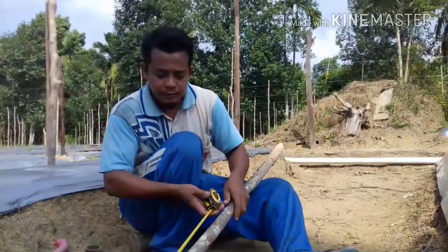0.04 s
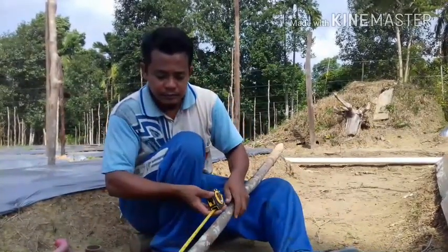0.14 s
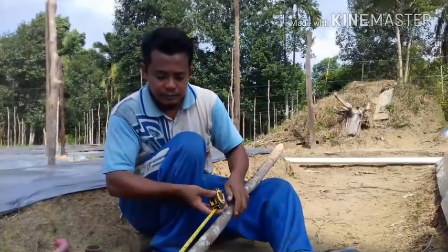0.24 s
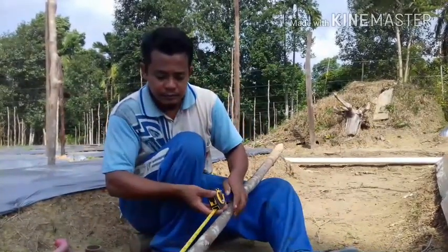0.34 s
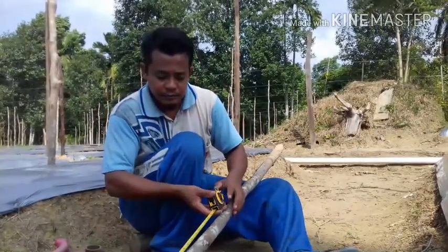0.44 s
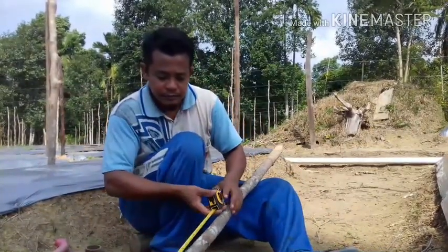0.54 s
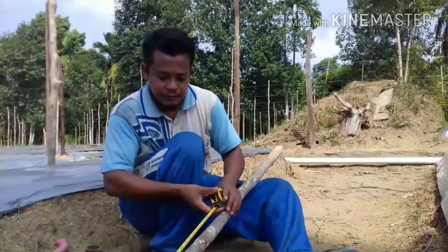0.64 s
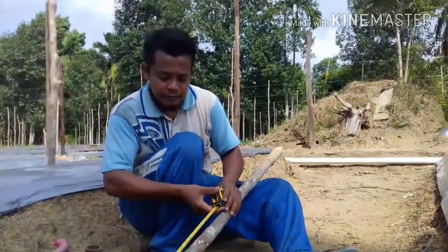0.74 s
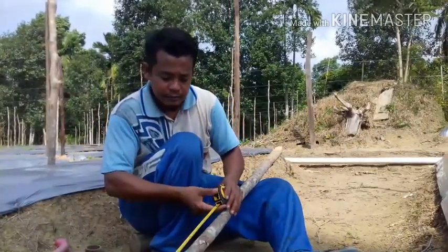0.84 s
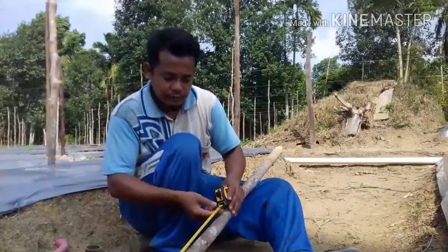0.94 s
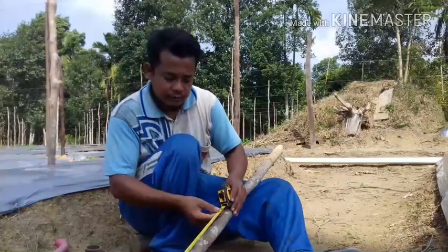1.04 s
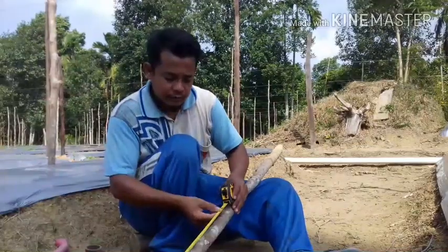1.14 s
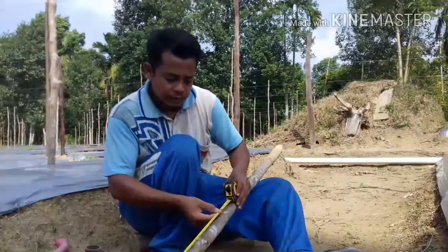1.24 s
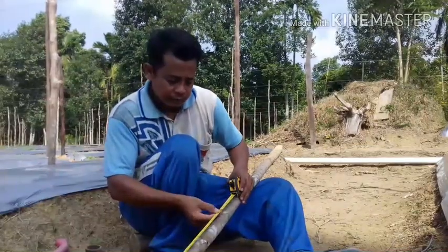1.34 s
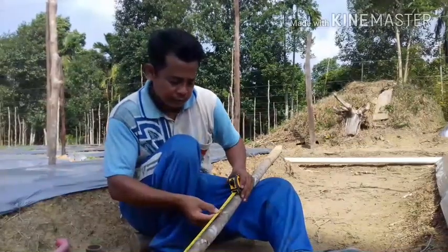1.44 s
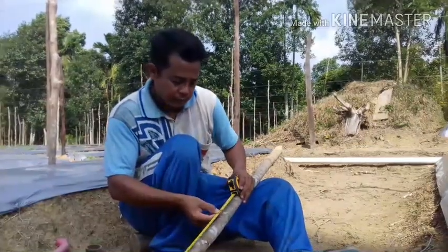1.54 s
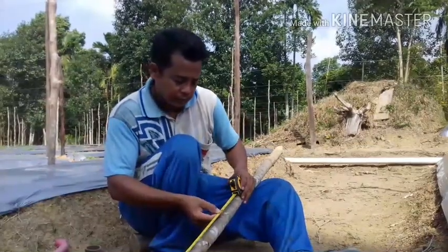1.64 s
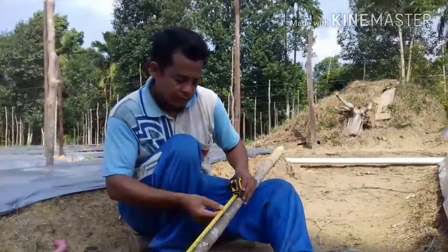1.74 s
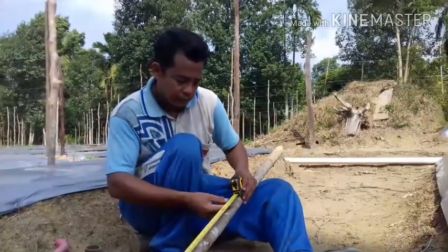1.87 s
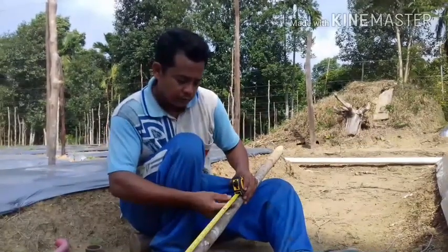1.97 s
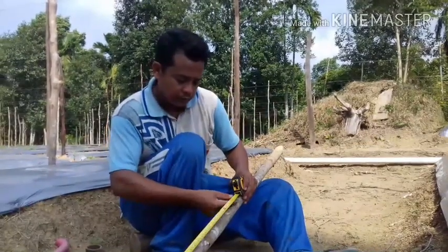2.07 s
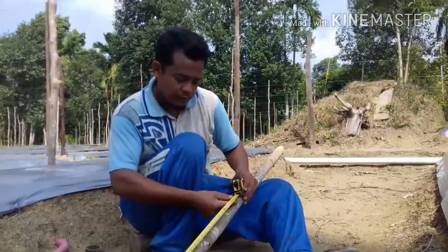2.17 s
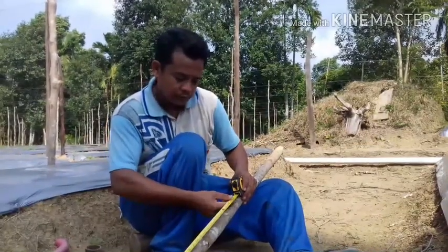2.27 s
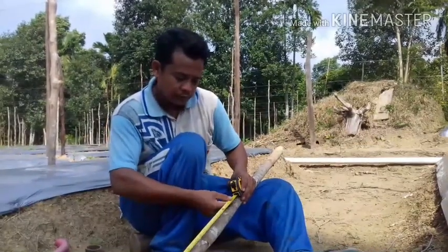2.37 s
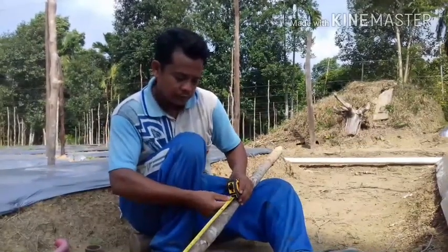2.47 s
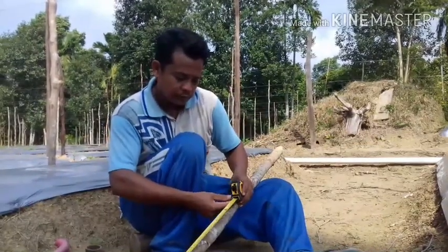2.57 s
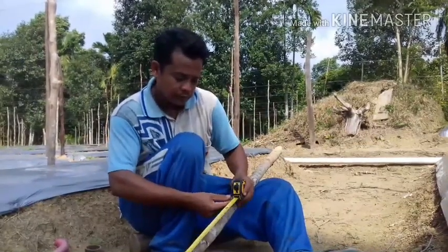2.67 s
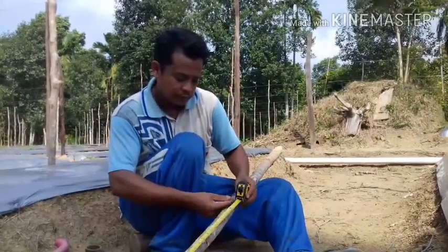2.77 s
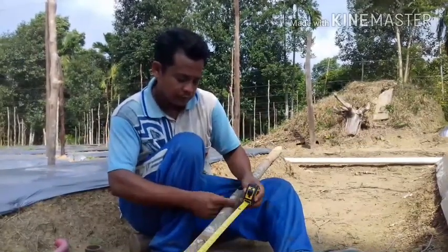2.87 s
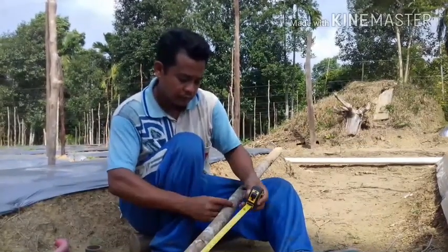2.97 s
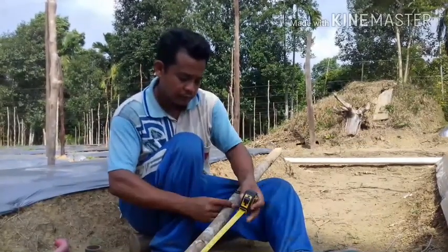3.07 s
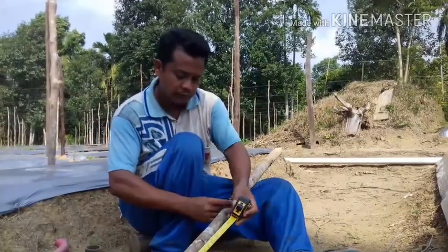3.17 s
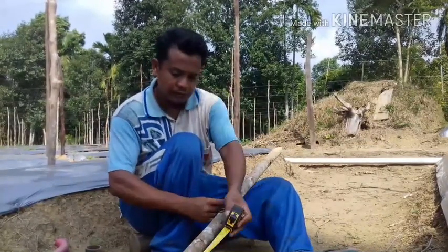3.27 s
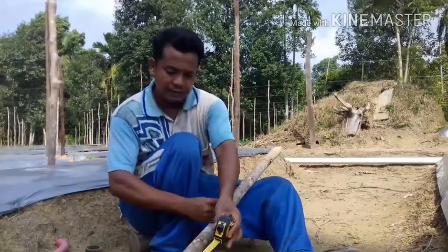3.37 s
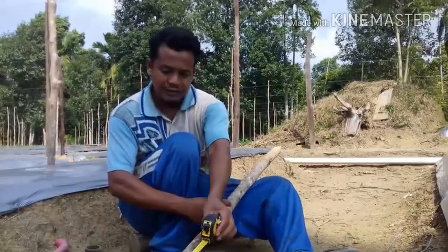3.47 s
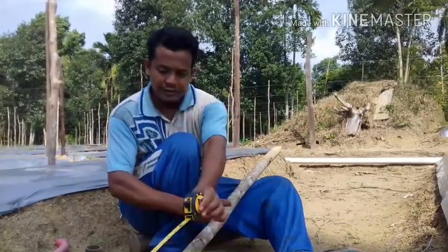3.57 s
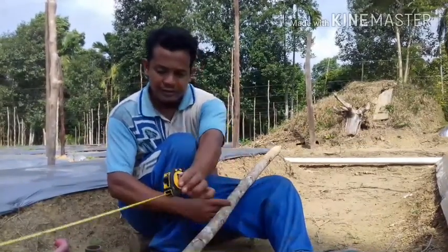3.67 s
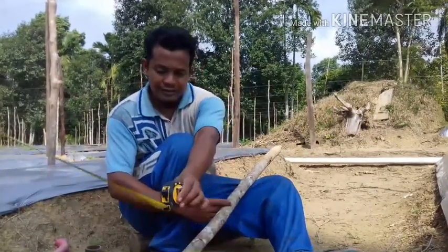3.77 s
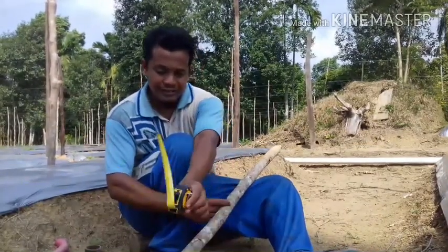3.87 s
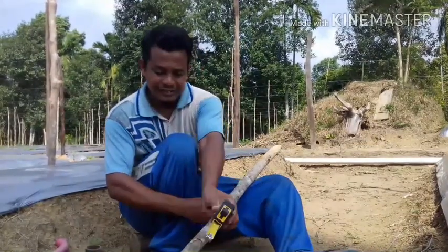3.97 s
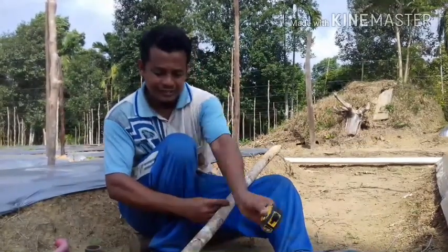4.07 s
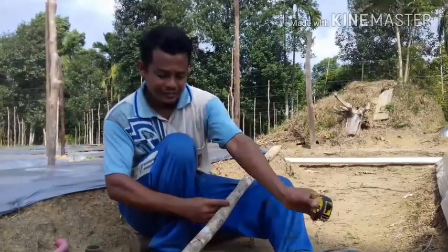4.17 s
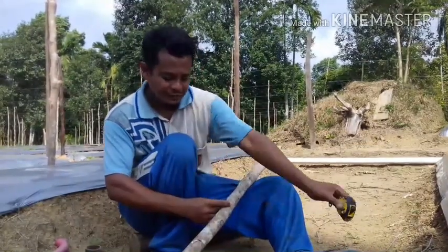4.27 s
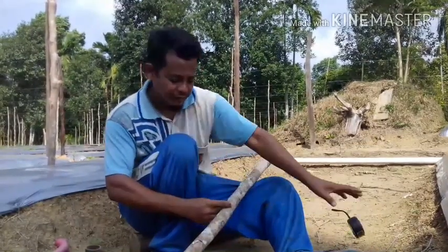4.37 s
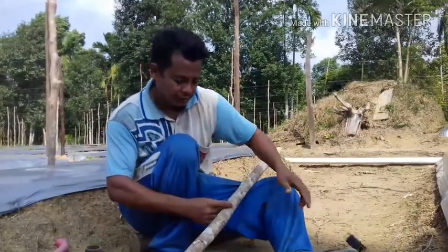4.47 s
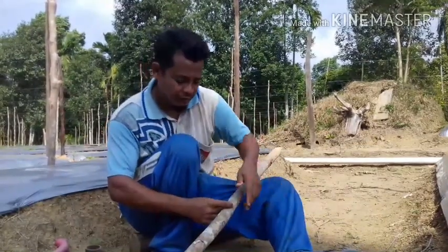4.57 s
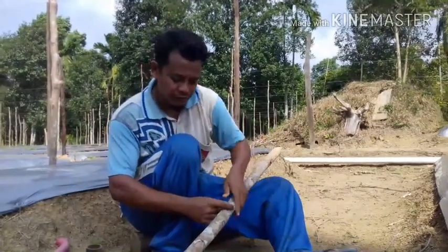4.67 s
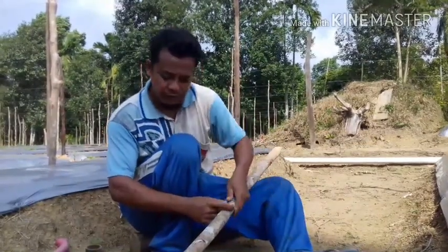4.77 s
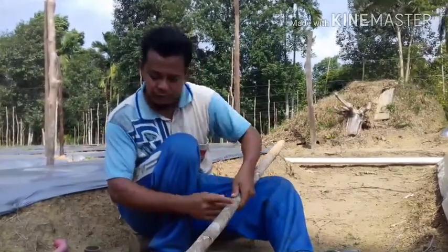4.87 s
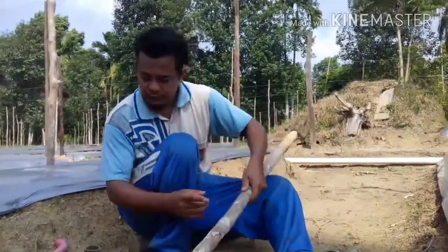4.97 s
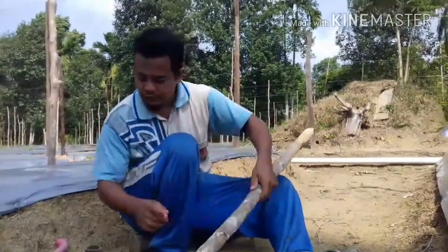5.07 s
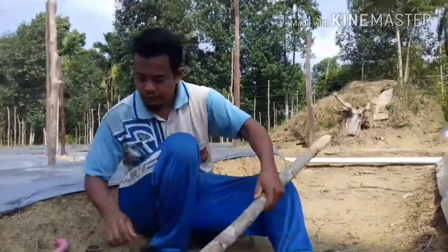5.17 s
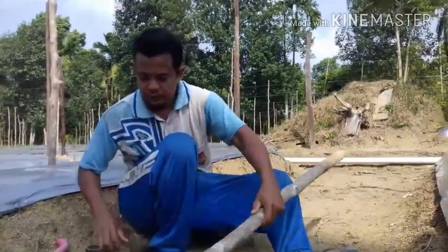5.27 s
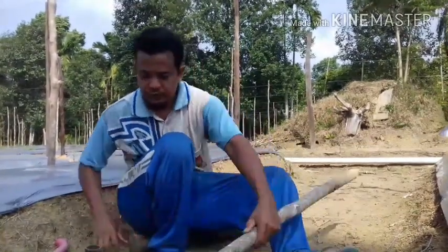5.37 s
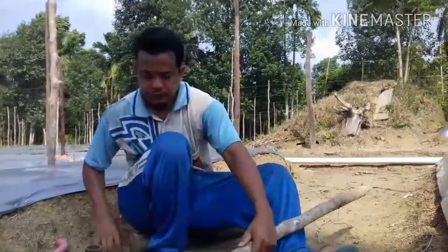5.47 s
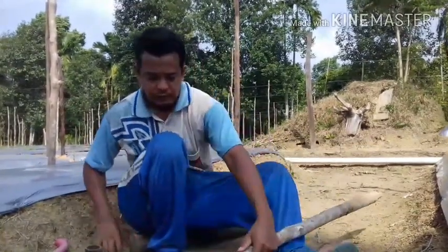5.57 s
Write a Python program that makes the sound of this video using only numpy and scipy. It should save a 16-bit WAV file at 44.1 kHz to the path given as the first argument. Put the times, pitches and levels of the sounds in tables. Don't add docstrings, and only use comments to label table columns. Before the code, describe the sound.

A quiet open clearing with soft leaf rustle, high insect hiss and tiny low wind bumps on a close phone microphone. A thin cicada buzz swells and breaks off at about 1.05 s; at 1.2 s a bird call slides quickly downward with a woodland echo. Faint held whistles near 3 kHz recur, with low dove hoots around 1.3 to 2.5 s. Steel blade ticks are sparse and light near 0.75, 1.45 and 2.75 s. From 3.2 to 3.65 s the blade scuffs and ticks on the stick. At 3.87 s it runs home in a quickening metallic rattle, hitting the case at 4.05 s with by far the loudest bright snap, clattering until 4.13 s. A second, shorter snap comes at 4.22 s. The case drops on soil at 4.59 s with a muted clack, small rattles follow around 4.75 to 4.85 s, then faint wooden scuffs and knocks at 5.16 and 5.6 s.

```python
import sys
import numpy as np
from scipy import signal
from scipy.fft import rfft, irfft
from scipy.io import wavfile
from scipy.ndimage import uniform_filter1d, map_coordinates

SR = 44100
rng = np.random.default_rng(int(sys.argv[2]) if len(sys.argv) > 2 else 0)


def natural_amplitude(level_db):
    exponent = np.asarray(level_db, float) / 20
    return 10 ** exponent


def file_out(sig):
    cols = np.atleast_2d(sig).T
    lim = np.clip(cols, -1, 1)
    pcm = np.round(lim * 32767).astype(np.int16)
    wavfile.write(sys.argv[1], SR, pcm)


N = 247842
t = np.arange(N) / SR

# [f/Hz, level/dB]
AIR = [(120, -26), (200, -4.5), (387, -5.5), (416, -5), (456, -7), (482, -7.5), (735, -7), (1000, -9.5),
       (1810, -11), (2470, -15), (5230, -16.5), (5840, -28.5), (7010, -12), (8120, -28), (16000, -28.5)]
# [f/Hz, density level/dB]
AIR_SIDE = [(18, -44), (30, -15.5), (189, -4.5), (540, -7.5), (616, -5.5), (6720, -16), (14800, -23.5),
            (16000, -28.5)]
# [t/s, level/dB]
LEAVES = [
    (0, 5.5),
    (.7, 4.5),
    (2.3, 3),
    (3.2, 5),
    (3.85, 8.5),
    (4.4, 3.5),
    (5, 5),
    (5.3, 1.5),
    (5.62, 2.5),
]
# [f/Hz, density level/dB]
WIND = [(20, -25), (45, 0), (95, 3), (200, -6), (350, -14.5), (600, -48)]
# [t/s, level/dB]
GUST = [(0.0, -70.5), (1.39, -68.5), (1.72, -67.5), (1.85, -66), (2.14, -72), (2.7, -62.5), (3.0, -68),
        (3.44, -59), (3.66, -70), (3.96, -64), (4.3, -66.5), (4.5, -69.5), (4.8, -64), (5.05, -70),
        (5.4, -69.5), (5.62, -67)]
# [t/s, level/dB, f/Hz, length/ms]
PUFFS = [(0.12, -56, 80.8, 21), (0.278, -51, 109, 6.9), (0.497, -50.5, 102, 11), (0.549, -56, 89, 22),
         (0.949, -57, 109.5, 19), (1.584, -52, 82.6, 27), (1.931, -57, 128, 17), (2.379, -55.5, 91.7, 27),
         (2.838, -52.5, 97.6, 16), (2.868, -47, 115, 11), (2.887, -50, 80.8, 7), (3.445, -55, 130, 14),
         (2.906, -47, 87.6, 49), (3.081, -46, 152.4, 10.4), (3.133, -46, 93.5, 9.6), (3.17, -52, 137, 9.6),
         (3.217, -53, 118, 14), (3.274, -52, 84, 6.4), (3.312, -49, 129, 11), (3.379, -50, 129, 11),
         (3.416, -61, 92, 16), (3.488, -47, 94.3, 8.3), (3.52, -42.5, 121.4, 19), (3.837, -47.5, 90, 32),
         (3.866, -52, 130, 5.5), (3.923, -50.5, 118, 9.9), (3.987, -39, 163.1, 13), (4.234, -47.5, 100, 32),
         (4.601, -52, 178, 13), (4.623, -54, 89.6, 16), (4.707, -52.5, 110, 17), (4.83, -57.5, 101, 22)]
# [t/s, level/dB, f/Hz]
FLICKS = [(2.884, -40.5, 240), (2.904, -43.5, 170), (3.311, -49.5, 200), (3.35, -51, 230),
          (3.419, -42, 160), (3.652, -44, 180), (3.835, -47, 208), (3.985, -43.5, 208), (4.01, -47.5, 208),
          (4.597, -44, 208), (3.275, -59, 220), (3.152, -52.5, 190)]
FLICK_MS = 5.1

# [t/s, level/dB]
CICADA = [
    (0, -64),
    (.55, -62),
    (.85, -59.5),
    (1.045, -61),
    (1.075, -67.5),
    (1.15, -69),
]
# [f/Hz, width/Hz, level/dB]
CICADA_BODY = [(1860, 70, -7), (3200, 160, -8), (3400, 200, -3), (3545, 130, 1.5), (3650, 500, 0),
               (3870, 120, -3), (4250, 200, -11)]
# [t/s, frequency ratio]
CICADA_PITCH = [
    (0, 1.0),
    (.35, .993),
    (.7, 1.0),
    (1.05, 1.01),
]
BUZZ_HZ, BUZZ_DEPTH = 138, 0.16

# [t/s, f/Hz, level/dB]
SLIDE = [
    (1.164, 2230, -77),
    (1.188, 2195, -55),
    (1.228, 1987, -49.5),
    (1.25, 1853, -52.5),
    (1.302, 1723, -61.5),
    (1.366, 1600, -69),
    (1.4, 1590, -76),
]
# [t/s, level/dB]
TWEETS = [(1.91, -76), (2.378, -75), (2.895, -77)]
# [start t/s, length/s, f/Hz, peak level/dB, share of length at the peak]
NOTES = [(0.17, 0.32, 2938, -66, 0.65), (0.786, .37, 3090, -66, 0.42), (1.457, 0.24, 2950, -68.5, 0.84),
         (1.712, 0.19, 2950, -74, 0.25), (2.085, 0.32, 3096, -62.5, 0.63), (2.773, 0.16, 2928, -68, 0.28),
         (2.93, 0.12, 2950, -72.5, .6), (3.374, 0.3, 3095, -66, 0.33), (4.632, 0.35, 3095, -63.5, 0.2),
         (1.317, 0.33, 362, -70, 0.16), (1.992, 0.42, 371.4, -70.5, .36), (2.35, 0.19, 374, -71.5, .36),
         (0.06, 0.39, 413, -77, 0.32)]
NOTE_START_DB, NOTE_END_DB, NOTE_ECHO_DB = -7, -8, -11
SCOOP_ABOVE_HZ = 3000

# [peak t/s, rise/s, fall/s, level/dB, body level/dB]
RATTLES = [(0.758, 0.058, 0.028, -51.5, -36), (1.455, 0.044, .27, -60.5, -2),
           (2.75, 0.021, 0.011, -48, -31), (4.058, 0.047, 0.048, -34, -16), (4.034, .002, 0.068, -35, -11),
           (4.097, 0.0034, 0.019, -38, -6.5), (4.128, .02, 0.18, -46.5, -5.5),
           (4.213, .002, 0.026, -38, -30), (4.226, 0.012, 0.014, -35, -29), (4.242, 0.072, .004, -48, -24),
           (4.25, .01, 0.037, -58, -14), (4.594, .004, 0.042, -43.5, -16), (4.625, 0.024, 0.02, -55.5, -22),
           (4.648, 0.022, 0.046, -57.5, -18), (4.748, 0.01, 0.05, -50.5, 1), (4.78, .06, 0.012, -53, -1),
           (4.81, 0.011, 0.035, -60, -5), (4.845, 0.015, .03, -55, -9.5), (4.115, 0.036, 0.012, -43.5, -13)]
# [peak t/s, rise/s, fall/s, level/dB, body level/dB]
SCUFFS = [(3.262, 0.11, 0.21, -58, -14), (3.386, 0.012, 0.024, -53, 2.5), (3.46, 0.0089, 0.083, -49.5, -12),
          (3.51, .1, .075, -51, -10), (5.573, .023, .3, -58.5, 5), (5.158, 0.018, 0.027, -60, 3.5),
          (3.274, .003, 0.0065, -63, -24)]
# [t/s, level/dB]
RUN_HOME = [
    (3.868, -50),
    (3.919, -46),
    (3.922, -41),
    (3.975, -44),
    (4.0, -43),
    (4.03, -41),
]
RATTLE_TREBLE_DB, SCUFF_TREBLE_DB, RUN_TREBLE_DB, RUN_BODY_DB = -13.5, -7.5, -13, -19.5
SHELL_DB = -11
LOOSE_PER_S, LOOSE_DB, LOOSE_SCATTER_DB, LOOSE_HZ, LOOSE_SPREAD_HZ = 70, 0, -0.5, 4360, 420
# [start t/s, end t/s]
NO_LOOSE_S = (3.86, 4.26)

# [t/s, level/dB, ring f/Hz, treble level
# relative to the blow/dB]
BLOWS = [(4.0465, -29, 4200, -14), (4.0502, -21, 4570, -12), (4.0517, -21, 3830, -14),
         (4.0559, -4.5, 4400, -15.5), (4.0627, -21, 3630, -17), (4.0655, -15, 3715, -26),
         (4.0678, -15, 3800, -11), (4.0743, -24, 4020, -12), (4.0812, -24, 3140, -12),
         (4.0963, -26, 3500, -8), (4.1, -19, 4480, -17), (4.1044, -25, 2560, -13), (4.1074, -23, 3950, -14),
         (4.109, -25, 2310, -13), (4.1151, -26, 3890, -21), (4.2131, -24, 4050, -14),
         (4.2172, -32, 3620, -20), (4.221, -27, 4060, -19), (4.2228, -13.5, 4500, -13),
         (4.224, -19, 4700, -12), (4.2251, -15.5, 4150, -3), (4.2262, -16, 3100, -20),
         (4.2297, -28, 3720, -24), (4.2358, -30, 3450, -30), (4.5895, -36, 1700, -24),
         (4.5912, -41, 1904, -14), (4.5929, -30, 4440, -19), (4.5977, -33, 3300, -28),
         (4.6043, -46, 3380, -33), (5.5078, -45, 3926, -20),
         (4.033, -33, 3920, -14), (4.0376, -32, 4220, -9), (4.0423, -30, 3940, -12),
            (4.0483, -27, 4180, -16), (4.0532, -29, 3920, -9), (4.0597, -28, 2540, -9),
            (4.061, -24, 3600, -10), (4.0707, -26, 4130, -11), (4.0726, -28, 4500, -13),
            (4.0752, -29, 4285, -12), (4.0792, -32, 4690, -11), (4.0858, -34, 4300, -9),
            (4.0875, -34, 3190, -9), (4.0981, -27, 4005, -6), (4.1026, -27, 4300, -8),
            (4.1057, -27, 3900, -11), (4.1103, -25, 4540, -12), (4.1129, -28, 4460, -10),
            (4.1187, -31, 4460, -15), (4.1207, -32, 2200, -26), (4.1224, -35, 4240, -15),
            (4.2124, -38, 3000, -6), (4.2279, -28, 2250, -16), (4.2316, -30, 2900, -30),
            (4.2328, -32, 2250, -20), (4.234, -32, 2200, -23), (4.2379, -31, 3200, -24),
            (4.2407, -39, 3660, -28), (4.2427, -36, 4370, -24), (4.2688, -58, 3700, 0),
            (3.9205, -42, 3300, -4), (3.2736, -50, 4330, -7), (3.2377, -56, 4360, -10),
            (3.4958, -42, 4350, -14), (4.0547, -17, 4100, -14), (4.0571, -27, 4300, -10),
            (4.0829, -28, 3000, -14), (4.0951, -31, 3600, -12), (4.5908, -41, 800, -24),
            (4.5952, -35, 4200, -26), (4.601, -40, 3400, -28)]
# [t/s, level/dB, ring f/Hz]
TICKS = [(0.619, -55, 4550), (0.752, -46, 4230), (0.76, -42.5, 4340), (0.93, -52, 3610), (1.352, -55, 4200),
         (1.401, -55, 4170), (1.449, -50.5, 3240), (1.505, -51, 3940), (2.709, -48.5, 4040),
         (2.743, -45, 4420), (2.752, -48, 3090), (3.257, -46.5, 4170), (3.4024, -55, 3930),
         (3.6256, -44.5, 4100), (3.648, -47.5, 3700), (3.6515, -51, 4100), (3.8683, -42.5, 3940),
         (3.9238, -36.5, 4700), (3.95, -34, 4320), (3.968, -37, 4190), (4.1242, -37.5, 2095),
         (4.455, -52.5, 3820), (4.6266, -53, 3460), (4.6525, -56.5, 3350), (4.748, -47.5, 3760),
         (4.772, -45, 3720), (4.78, -43.5, 3920), (4.8472, -44, 3260), (5.159, -52.5, 3850),
         (3.384, -48, 3120),
         (3.8762, -44, 4100), (3.8795, -47, 3900), (3.8907, -40, 4200), (3.897, -41, 4040),
        (3.9254, -38, 4200), (3.935, -40, 4400), (3.941, -35, 4300), (3.9558, -36.5, 4380),
        (3.9782, -37.5, 4500), (3.9883, -38, 4700), (3.9965, -41, 3850), (3.9996, -33, 3850),
        (4.0029, -49, 4200), (4.0116, -38, 3915), (4.0165, -49, 3875), (4.0232, -38, 4820),
        (4.0287, -49, 4960), (3.2085, -58, 4200), (3.314, -50, 4440), (3.4544, -48, 4120),
        (3.4576, -41, 4700), (3.4644, -42, 4400), (3.4727, -50, 4860), (3.5116, -52, 4715),
        (3.5165, -53, 4300), (3.5252, -48, 4360), (3.535, -58, 3640)]
# [f/Hz, level/dB, relative ring time]
CASE_MODES = [(2190, -6.5, 1.6), (3085, -7.5, 1.5), (7050, -1.5, 1.0)]
# [f/Hz, density level/dB]
CASE = [(180, -47.5), (300, -18), (634, -10.5), (900, -13.5), (1250, -18), (1600, -16), (2140, -11),
        (2700, -10), (3080, -2.5), (3700, 1.5), (4370, 2), (5300, -10), (6100, -17), (6960, -13.5),
        (8500, -25), (12500, -26), (15200, -32.5), (16000, -48)]
# [low f/Hz, high f/Hz]
BANDS_HZ = [(1600, 6600), (5400, 16500), (300, 1900), (5400, 11500), (2030, 2370)]
# [rise/s, fall/s]
BLOW_S = [(0.00028, 0.00075), (.0003, 0.0011), (0.00098, 0.001)]
BLOW_MS, TICK_MS = 0.8, 1.3
BODY_DB, BODY_SLOPE = -24, -0.73
TREBLE_LEAD_S = 0.0005

# [t/s, f/Hz, level/dB]
HOOK = [(4.047, 1350, -38.5), (4.0507, 1400, -35.5), (4.0655, 1300, -35.5), (4.0677, 1400, -30.5),
        (4.0748, 1350, -31.5), (4.079, 1300, -41), (4.081, 1400, -34), (4.083, 1250, -39),
        (4.0975, 1350, -38.5), (4.1068, 1400, -36), (4.0455, 5700, -44), (4.049, 5800, -35.5),
        (4.051, 5600, -36), (4.065, 5700, -34.5), (4.067, 5900, -33), (4.075, 5600, -40.5),
        (4.083, 5800, -42), (4.0975, 5900, -39), (4.1005, 5700, -37), (4.107, 5600, -38),
        (4.109, 5900, -37.5), (4.115, 5700, -42), (4.117, 5800, -44.5)]
HOOK_RISE_S, HOOK_FALL_S = 0.0007, 0.0009
# [t/s, f/Hz, level/dB, rise/s, fall/s]
KNOCKS = [(5.017, 950, -61, .004, 0.02), (5.16, 1100, -60, 0.004, 0.007),
          (5.582, 1110, -51.5, 0.008, 0.012), (5.615, 110, -53, 0.0068, .006),
          (4.59, 1620, -38, .001, .002), (4.597, 4150, -41, .002, .004), (4.6025, 3450, -43, .002, .003),
          (4.609, 4520, -47, .003, .006), (4.232, 2200, -36, .002, .005), (4.252, 3900, -52, .003, .01),
          (4.226, 520, -28, .0014, .001), (4.229, 720, -38, .0015, .003), (4.593, 780, -41, .002, .003),
          (4.76, 436, -51, .0015, .001)]


def unit(x):
    return x / np.sqrt(np.mean(x ** 2))


def colour(x, points):
    hz, db = np.transpose(points)
    f = np.maximum(np.fft.rfftfreq(4096, 1 / SR), 1)
    c = irfft(np.log(natural_amplitude(np.interp(np.log(f), np.log(hz), db))))
    c[1:2048] *= 2
    c[2049:] = 0
    return signal.fftconvolve(x, irfft(np.exp(rfft(c))))[:N]


def band(x, lo_hz, hi_hz, order=3):
    sos = signal.butter(order, [lo_hz, hi_hz], "bandpass", fs=SR, output="sos")
    return signal.sosfilt(sos, x)


def walk(rate):
    k = int(SR / rate)
    steps = np.repeat(rng.standard_normal(N // k + 1), k)
    return unit(uniform_filter1d(uniform_filter1d(steps, k), k)[:N])


def bump(s, rise, fall):
    first = max(int((s - 3 * rise) * SR), 0)
    i = np.arange(first, min(int((s + 8 * fall) * SR), N))
    d = i / SR - s
    return i, np.where(d < 0, np.exp(-(d / rise) ** 2), np.exp(-d / fall))


def air():
    whole = unit(colour(rng.standard_normal(N), AIR)) * natural_amplitude(-66.5)
    low = signal.sosfiltfilt(signal.butter(2, 2300, fs=SR, output="sos"), whole)
    high = signal.sosfiltfilt(signal.butter(3, 5800, "highpass", fs=SR, output="sos"), whole)
    rustle_db = np.interp(t, *np.transpose(LEAVES))
    low_gain = natural_amplitude(0.18 * rustle_db + 0.8 * walk(7.3))
    middle_gain = natural_amplitude(rustle_db + 0.29 * walk(16))
    side = unit(colour(rng.standard_normal(N), AIR_SIDE)) * natural_amplitude(-72.5)
    middle = whole - low - high
    return low * low_gain + middle * middle_gain + high + side * np.array([[1], [-1]])


def wind():
    gust_db = np.interp(t, *np.transpose(GUST)) + 2.2 * walk(30)
    out = unit(colour(rng.standard_normal(N), WIND)) * natural_amplitude(gust_db)
    eddies = PUFFS + [(s, db, hz, FLICK_MS) for s, db, hz in FLICKS]
    for (s, db, hz, ms), turn in zip(eddies, rng.random((len(eddies), 1))):
        i, swell = bump(s, 0.00043 * ms, 0.00031 * ms)
        out[i] += natural_amplitude(db + 2.5) * swell * np.sin(2 * np.pi * (hz * i / SR + turn))
    return out


def cicada():
    clicks = rng.standard_normal(N)
    drum = np.zeros(N)
    for k, (hz, width, db) in enumerate(CICADA_BODY):
        shifted = np.roll(clicks, k * SR)
        drum += natural_amplitude(db) * unit(band(shifted, hz - width / 2, hz + width / 2, order=2))
    place = np.cumsum(np.interp(t, *np.transpose(CICADA_PITCH)))
    drum = map_coordinates(drum, [place], mode="mirror")
    buzz_hz = BUZZ_HZ * (1 + 0.02 * walk(9))
    buzz = 1 + BUZZ_DEPTH * np.cos(2 * np.pi * np.cumsum(buzz_hz) / SR)
    return unit(drum * buzz) * natural_amplitude(np.interp(t, *np.transpose(CICADA), right=-200))


def birds():
    s, hz, db = np.transpose(SLIDE)
    slide_gain = natural_amplitude(np.interp(t, s, db + 1, -200, -200))
    song = slide_gain * np.sin(2 * np.pi * np.cumsum(np.interp(t, s, hz)) / SR)
    waver, patchy = 1 + 0.0012 * walk(25), natural_amplitude(2.2 * walk(40))
    for s0, db in TWEETS:
        i, swell = bump(s0 + 0.036, 0.028, 0.02)
        pitch = np.interp(i / SR - s0, [0, 0.015, 0.08], [5150, 5050, 3400])
        song[i] += natural_amplitude(db) * swell * patchy[i] ** 2 * np.sin(2 * np.pi * np.cumsum(pitch) / SR)
    held = np.zeros(N)
    for s0, length, hz, db, share in NOTES:
        top, s1 = s0 + np.clip(share, 0.1, 0.9) * length, s0 + length
        scoop, scoop_s = (0.028, 0.03) if hz > SCOOP_ABOVE_HZ else (0.012, 0.07)
        pitch = hz * waver * (1 - scoop * np.exp(-np.maximum(t - s0, 0) / scoop_s))
        gate = np.clip(np.minimum((t - s0) / 0.026, (s1 + 0.041 - t) / 0.06), 0, 1)
        swell_db = np.interp(t, [s0, top, s1], [NOTE_START_DB, 0, NOTE_END_DB]) + db
        held += gate * natural_amplitude(swell_db) * patchy * np.sin(2 * np.pi * np.cumsum(pitch) / SR)
    return song, held


def trees(x, t60, db):
    d = np.arange(SR) / SR
    decay = np.exp(-np.log(1000) * d / t60) * np.clip(d / 0.024, 0, 1)
    tail = rng.standard_normal((2, SR)) * decay
    tail = tail[0] + 0.24 * tail[1] * np.array([[1], [-1]])
    tail /= np.sqrt(np.sum(decay ** 2))
    return natural_amplitude(db) * signal.fftconvolve(x[None], tail, axes=1)[:, :N]


def rattle():
    out = np.zeros((5, N))
    kinds = ((RATTLES, RATTLE_TREBLE_DB, -200, SHELL_DB),
             (SCUFFS, SCUFF_TREBLE_DB - 11, SCUFF_TREBLE_DB, -200))
    for rows, treble_db, dull_db, shell_db in kinds:
        for s, rise, fall, db, body_db in rows:
            swell = natural_amplitude(db - 20 * np.where(t < s, (s - t) / rise, (t - s) / fall))
            out += swell * natural_amplitude(np.array([[0], [treble_db], [body_db], [dull_db], [shell_db]]))
    run = natural_amplitude(np.interp(t, *np.transpose(RUN_HOME), -200, -200))
    return out + run * natural_amplitude(np.array([[0], [RUN_TREBLE_DB], [RUN_BODY_DB], [-200], [-200]]))


def loose_ticks(level):
    when, size, pitch = rng.random((int(LOOSE_PER_S * N / SR), 3)).T
    rattle_db = 20 * np.log10(level[(when * N).astype(int)] + 1e-9)
    db = rattle_db + LOOSE_DB + LOOSE_SCATTER_DB * 2 * (2 * size - 1)
    hz = LOOSE_HZ + LOOSE_SPREAD_HZ * 2 * (2 * pitch - 1)
    rows = zip(when * N / SR, db, hz)
    return [row for row in rows if row[1] > -66 and not NO_LOOSE_S[0] < row[0] < NO_LOOSE_S[1]]


def tape():
    blows, chatter, ring = np.zeros((5, N)), rattle() * natural_amplitude(-4.5), np.zeros(N)
    events = [(s, db, hz, treble_db, BODY_DB + BODY_SLOPE * (db + 23), BLOW_MS)
              for s, db, hz, treble_db in BLOWS]
    events += [(s, db, hz, -23, -18, TICK_MS) for s, db, hz in TICKS + loose_ticks(chatter[0])]
    for (s, db, hz, treble_db, body_db, ms), (turn, *share) in zip(events, rng.random((1000, 4))):
        soft_db = np.clip(0.4 * (db + 14.0), -16, 0)
        i, swell = bump(s, 0.00061 * ms, 0.00064 * ms)
        ring[i] += natural_amplitude(db - 0.5) * swell * np.sin(2 * np.pi * (hz * i / SR + turn))
        mode_gains = (soft_db, soft_db, treble_db)
        for (mode_hz, mode_db, ring_time), rel_db, part in zip(CASE_MODES, mode_gains, share):
            i, swell = bump(s, 0.00048 * ms, 0.00058 * ms * ring_time)
            gain = natural_amplitude(db + rel_db + mode_db - 5.4 * part)
            ring[i] += gain * swell * np.sin(2 * np.pi * (mode_hz * i / SR + part))
        for k, rel_db in enumerate((-14, treble_db, body_db)):
            lead_s = TREBLE_LEAD_S * (k == 1)
            i, swell = bump(s - lead_s, BLOW_S[k][0] * ms, BLOW_S[k][1] * ms)
            blows[k, i] += natural_amplitude(db + rel_db) * swell
    knocks = (rng.random(N) < 900 / SR) * natural_amplitude(3.8 * rng.exponential(size=N).clip(0, 3))
    bursts = signal.lfilter([1], [1, -np.exp(-1 / (0.00065 * SR))], knocks)
    grain = unit(1.2 + unit(bursts))
    out = ring
    for k, (lo_hz, hi_hz) in enumerate(BANDS_HZ):
        noise = rng.standard_normal(N)
        gain = np.std(band(colour(noise, CASE), lo_hz, hi_hz))
        shaken = noise * (blows[k] + chatter[k] * grain)
        out = out + band(colour(shaken, CASE), lo_hz, hi_hz) / gain
    return out


def stick():
    out = np.zeros(N)
    for s, hz, db, rise, fall in KNOCKS + [(*row, HOOK_RISE_S, HOOK_FALL_S) for row in HOOK]:
        i, swell = bump(s, rise, fall)
        out[i] += natural_amplitude(db) * swell * np.sin(2 * np.pi * hz * i / SR)
    return out


def scene():
    steel = tape() + stick()
    song, held = birds()
    steel = steel + natural_amplitude(-34) * np.array([[1], [-1]]) * np.roll(steel, 9)
    near_echo = trees(steel[0], 0.086, -33.0)
    far_echo = trees(song + natural_amplitude(NOTE_ECHO_DB) * held, 1.44, -7.5)
    return steel + near_echo + song + held + far_echo + wind() + cicada() + air()


def low_pass(x):
    return signal.sosfilt(signal.butter(12, 16400, fs=SR, output="sos"), x)


def record(dry):
    rounded = np.tanh(2 * dry) / 2
    cut = signal.sosfilt(signal.ellip(8, 0.2, 60, 15700, fs=SR, output="sos"), rounded)
    cut = signal.sosfilt(signal.butter(2, 45, "highpass", fs=SR, output="sos"), cut)
    return low_pass(cut - 0.00054)


dry = scene()
out = record(dry)
file_out(out)
```